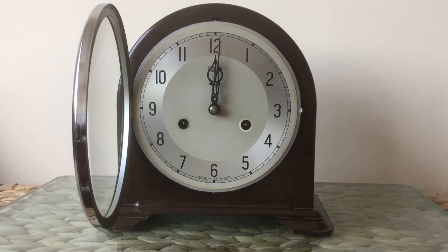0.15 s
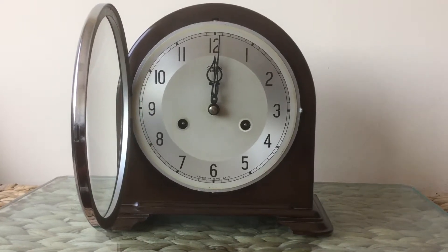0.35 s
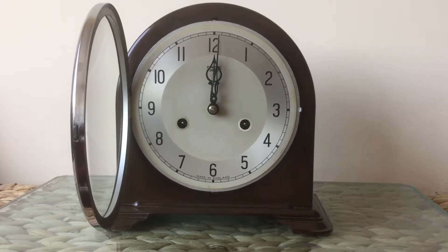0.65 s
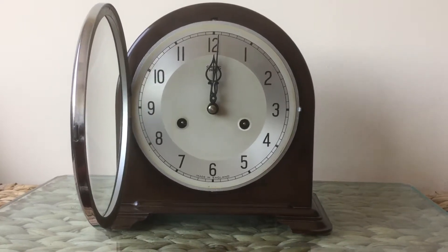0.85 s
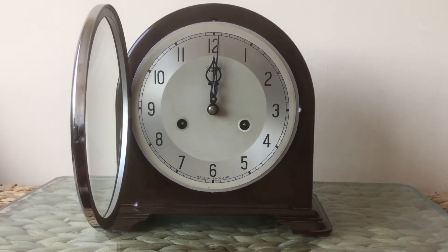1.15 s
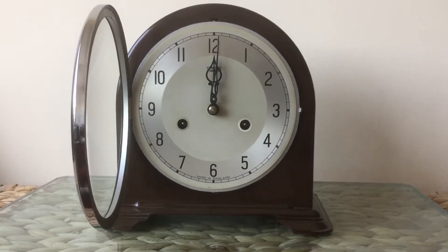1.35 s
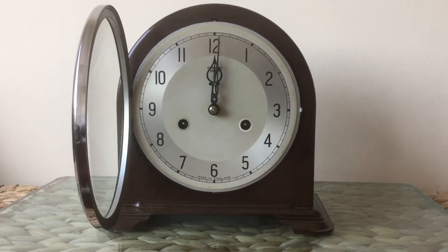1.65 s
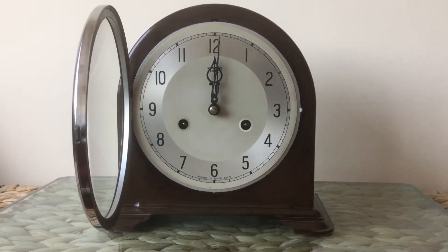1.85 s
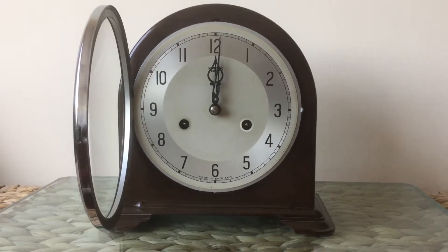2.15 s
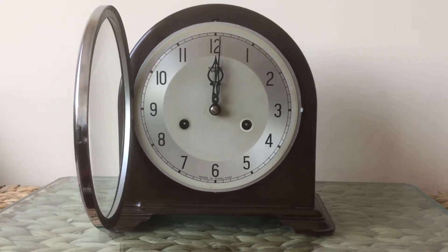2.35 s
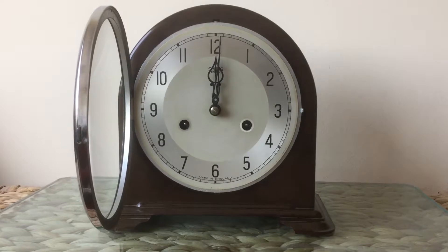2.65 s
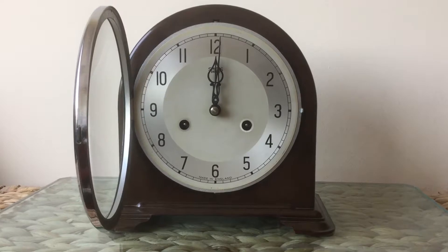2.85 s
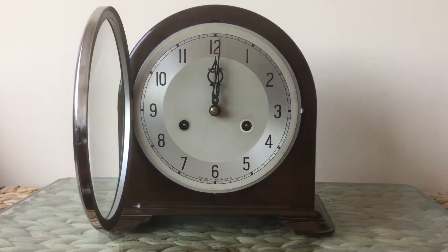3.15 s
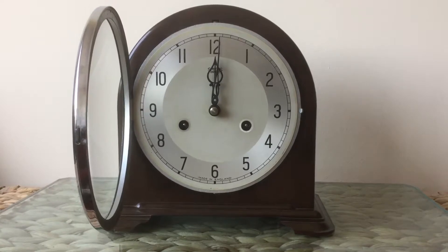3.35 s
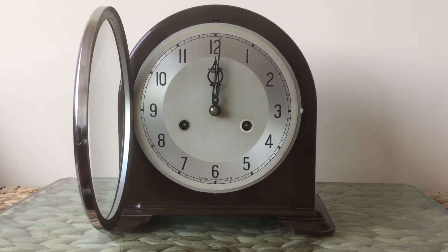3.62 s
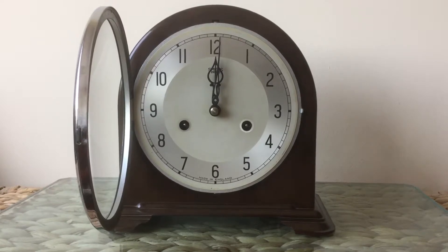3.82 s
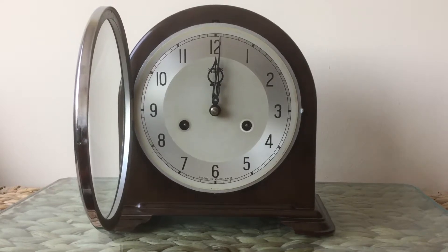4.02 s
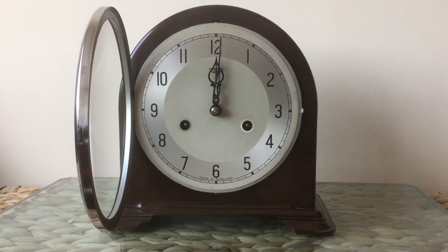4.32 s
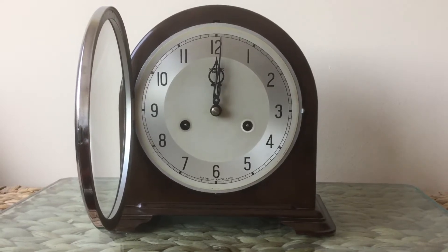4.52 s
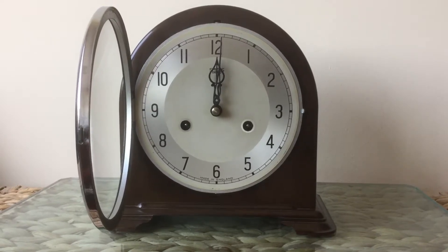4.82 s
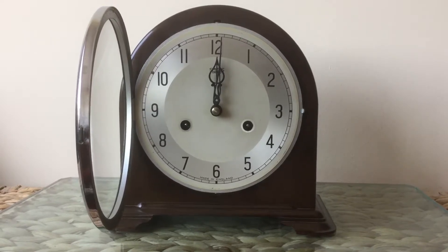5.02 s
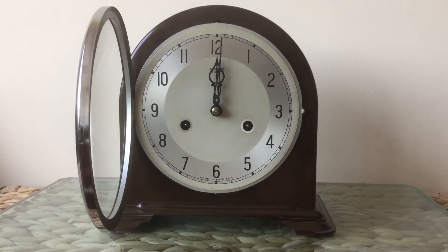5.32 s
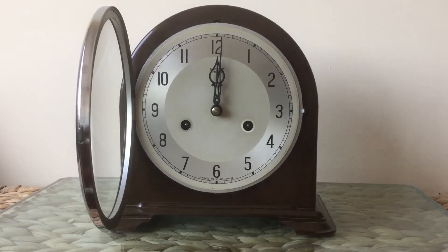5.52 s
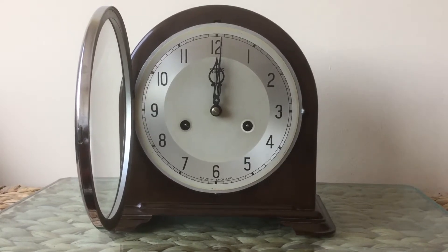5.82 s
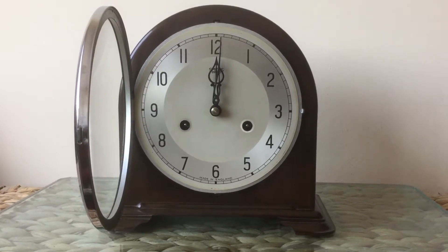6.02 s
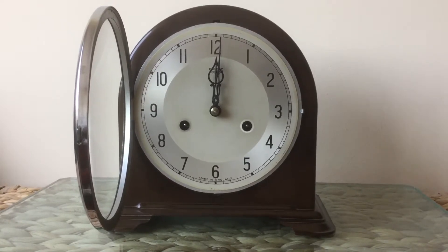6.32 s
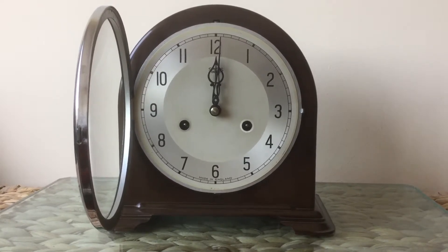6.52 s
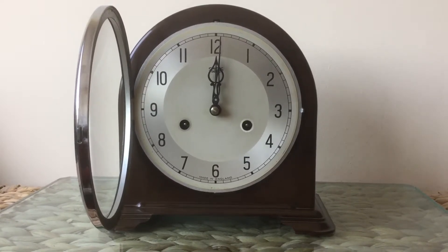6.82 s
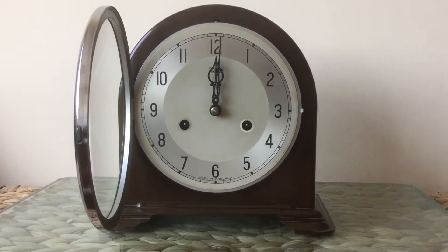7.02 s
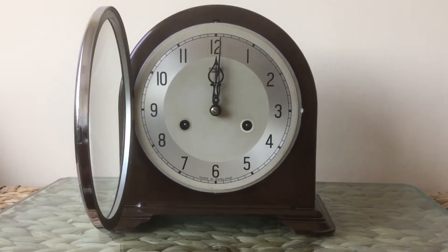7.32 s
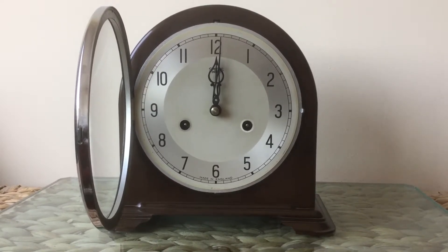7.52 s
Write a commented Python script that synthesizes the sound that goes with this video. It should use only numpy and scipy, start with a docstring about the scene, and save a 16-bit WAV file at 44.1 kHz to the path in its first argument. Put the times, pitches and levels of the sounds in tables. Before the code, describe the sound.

Three slow, evenly spaced strikes sound from the gong of a wooden mantel clock, heard up close in a still room. Each is announced by a small brassy click and lands with a short knock and chatter, then leaves a long, shimmering metal ring that overlaps the next. The ring of earlier blows is there from the start, and a faint fluttering whirr of clockwork runs underneath throughout.

```python
"""A mantel clock is striking the hour in a quiet room. At the start its coiled steel gong still rings
from earlier blows, and the fly, the air brake of the strike train, whirrs softly. A pin clicks as it
lifts the hammer. Then the hammer drops: the wooden case knocks, the hammer chatters on the coil, and
the gong's long partials add to what was left ringing. Click and blow come three times, about 2.7 s
apart, and the gong rings on after the last."""
import sys
import numpy as np
from scipy import signal
from scipy.fft import rfft, irfft
from scipy.io import wavfile

SR = 44100
rng = np.random.default_rng(int(sys.argv[2]) if len(sys.argv) > 2 else 0)


def unload_wav(signal):
    """Save mono or channel-first audio to the path in sys.argv[1] as 16-bit WAV at rate SR, clipped to [-1, 1]."""
    wavfile.write(
        sys.argv[1],
        SR,
        np.round(np.clip(np.atleast_2d(signal).T, -1, 1) * 32767).astype(np.int16),
    )


N = 338247


def undb(db):
    """Gain of a level in dB."""
    return 10 ** (np.asarray(db) / 20)


def level(x, db):
    """Scale to an rms level."""
    return x * undb(db) / np.sqrt(np.mean(x ** 2))


def along(table, hz):
    """Read a curve of (frequency, value) points on a log-frequency axis."""
    points_hz, values = np.transpose(table)
    return np.interp(np.log(hz), np.log(points_hz), values)


def coloured(eq, size):
    """Noise through an EQ curve, rolling off 4 dB an octave below its first point."""
    hz = np.maximum(np.arange(size // 2 + 1) * SR / size, 1)
    rolloff_db = 4 * np.maximum(np.log2(eq[0][0] / hz), 0)
    return irfft(rfft(rng.standard_normal(size)) * undb(along(eq, hz) - rolloff_db), size)


def ring(hz, t60, times, sizes, attack_s):
    """One mode kicked at the given times; each kick swells in and adds to the phase already ringing."""
    onsets = np.maximum(np.ceil(times * SR).astype(int), 0)
    parts = []
    for loss in np.log(1000) / t60, 1 / attack_s:
        pole = 2j * np.pi * hz - loss
        kicks = np.zeros(N, complex)
        np.add.at(kicks, onsets, sizes * np.exp(pole * (onsets / SR - times)))
        parts.append(signal.lfilter([1], [1, -np.exp(pole / SR)], kicks).imag)
    lasting, brief = parts
    return lasting - brief


def struck(modes, times, hit_db, scatter_db=3.5):
    """Short modes, each with a new phase and level at every hit."""
    out = 0
    chance = rng.random((len(times), len(modes), 2))
    for k, (hz, db, t60) in enumerate(modes):
        gains = undb(np.array(hit_db) + db + scatter_db * (chance[:, k, 0] - .5))
        phases = np.exp(2j * np.pi * chance[:, k, 1])
        out = out + ring(hz, t60, times, gains * phases, attack_s=.001)
    return out


# Room tone EQ: (frequency [Hz], relative level [dB])
ROOM_EQ = [(25, -13.5), (50, -13), (100, -2), (250, -0.5), (500, -18), (1200, -2.5), (3000, -30),
           (6000, -33), (10000, -34.5), (15500, -35)]


def room_tone():
    """Still air: a faint, dark bed of noise."""
    return level(coloured(ROOM_EQ, N), -63)


# Noise bands of the whirr: (centre [Hz], width [Hz], level [dB])
WHIRR_BANDS = [(2201, 30, -75), (2900, 310, -82), (6500, 2300, -90.5), (9320, 450, -81),
               (12900, 4000, -85.5)]


def fly_whirr(mean_hz=31.0, swing_hz=1.9, speedup_hz_per_s=.2, lag_s=.3, puff_sharpness=.5):
    """The vane puffs once a turn; it runs free once the hammer drops and slows under the next lift."""
    t = np.arange(N) / SR
    blows = np.append(BLOW_TIMES, 2 * BLOW_TIMES[-1] - BLOW_TIMES[-2])
    cycle = np.interp(t - lag_s, blows, np.arange(len(blows)))  # fastest lag_s after each blow
    rate_hz = mean_hz + swing_hz * np.cos(2 * np.pi * cycle) + speedup_hz_per_s * t
    turns = np.cumsum(rate_hz) / SR
    turn_gain = undb(2.3 * rng.standard_normal(N // 500))[turns.astype(int)]
    puffs = turn_gain * np.exp(-puff_sharpness * np.cos(2 * np.pi * turns))
    out = 0
    for hz, width, db in WHIRR_BANDS:
        resonance = signal.iirpeak(hz, hz / width, SR)
        out = out + level(signal.lfilter(*resonance, puffs * rng.standard_normal(N)), db)
    return out


# Cues for the hammer lifts: (time [s], level [dB])
LIFT_CUES = [(0.02, -54.5), (2.7357, -54.5), (5.431, -55.5)]
# Brass ring of the pin: (frequency [Hz], level relative to the cue [dB], decay t60 [s])
PIN_MODES = [(543, -7.5, 0.13), (1320, 2, 0.065), (2470, -7, 0.055), (6080, -14, 0.052), (7200, -11, 0.06),
             (8500, -8, .04), (15300, -8, .02)]


def pin_click(scrape_db=-5.5, scrape_t60=.076, low_cut_hz=2500):
    """The lifting pin meets the hammer tail: a short scrape and a faint ring of brass."""
    times, db = np.transpose(LIFT_CUES)
    triggers = np.zeros(N)
    triggers[(times * SR).astype(int)] = undb(db + scrape_db)
    envelope = signal.lfilter([1], [1, -undb(-60 / (scrape_t60 * SR))], triggers)
    scrape = signal.lfilter(*signal.butter(2, low_cut_hz, "high", fs=SR), rng.standard_normal(N))
    return envelope * scrape + struck(PIN_MODES, times, db)


# EQ of the hammer's rattle: (frequency [Hz], relative level [dB])
CHATTER_EQ = [(60, -24), (150, -13), (600, -8), (1100, 1), (2000, -10.5), (4000, -15.5), (6500, -15.5),
              (9000, -17), (11000, -14.5), (12700, -22), (14300, -19), (15500, -27)]
# Its tail in the case and room: (frequency [Hz], decay t60 [s])
CHATTER_DECAY = [(300, 0.48), (2000, 0.29), (6000, 0.2), (15000, 0.15)]


def hammer_chatter(attack_s=.0046, release_at_s=.027, grain_db=1.5):
    """The hammer rattles briefly on the coil; case and room carry it on, the treble dying first."""
    out, size = np.zeros(N + SR), SR // 2
    t = np.arange(size) / SR
    attack = np.minimum(t / attack_s, 1) ** 2
    for time in BLOW_TIMES[BLOW_TIMES > 0]:
        start = int(time * SR)
        grains = undb(grain_db * np.repeat(rng.exponential(size=size // 64 + 1), 64)[:size])
        rattle = level(coloured(CHATTER_EQ, size) * grains, -35.5)
        for hz in 100 * 2. ** np.arange(8):
            edges_hz = [hz / 2 ** .5, min(hz * 2 ** .5, .49 * SR)]
            octave = signal.sosfilt(signal.butter(3, edges_hz, "band", fs=SR, output="sos"), rattle)
            release = undb(-60 * np.maximum(t - release_at_s, 0) / along(CHATTER_DECAY, hz))
            out[start:start + size] += octave * attack * release
    return out[:N]


# Body of the wooden case: (frequency [Hz], level [dB], decay t60 [s])
CASE_MODES = [(204, -37.5, 0.057), (538, -35, 0.2), (755, -46, 0.16), (982, -17, 0.023), (1210, -39, 0.059),
              (2420, -27.5, 0.015), (2990, -48, 0.29)]


def case_knock(bounce_s=.0085):
    """The case knocks in a tight flam as the hammer hits the coil and touches it a second time."""
    hit = struck(CASE_MODES, BLOW_TIMES, BLOW_ACCENTS)
    bounce = struck(CASE_MODES, BLOW_TIMES + bounce_s, BLOW_ACCENTS)
    return hit + bounce


# Cues for the hammer blows; those before zero leave only their ring: (time [s])
BLOW_TIMES = np.array([-12.52165, -9.87919, -7.26131, -4.60689, -1.86231, .7704, 3.5048, 6.18259])
# Accent of each blow: (gain [dB])
BLOW_ACCENTS = [.4, .4, .4, 0.28, 0.79, 0.29, 0.26, 0.44]
# Partials of the coil; close pairs beat: (frequency [Hz], level [dB], decay t60 [s])
GONG_PARTIALS = [(137.9, -68.9, 40.4), (167.2, -54.3, 18.5), (219.79, -50.2, 28.2), (288.75, -56.0, 21.7),
                 (367.08, -45.0, 11.2), (452.99, -38.6, 2.3), (653.55, -60.7, 20.4), (657.18, -48.5, 9.7),
                 (766.14, -44, 19.0), (881.83, -38.4, 13.0), (1007.22, -32.6, 8.8), (1138.91, -37.6, 12.9),
                 (1144.35, -58.2, 10.8), (1227.04, -66, 6.3), (1276.27, -61.2, 13.0),
                 (1419.53, -50.8, 15.3), (1569.43, -41.4, 13.8), (1724.29, -43.1, 9.9),
                 (1887.07, -46.9, 8.4), (2054.09, -56.8, 8.3), (2227.95, -56.5, 11.0),
                 (2229.39, -64.3, 12.2), (2409.45, -60.5, 6.3), (2595.95, -52.7, 7.0),
                 (2788.42, -63.0, 8.5), (2923.2, -71, 5.0), (2987.67, -58.7, 6.9), (3052.15, -67.5, 5.5),
                 (3192.84, -55.3, 7.1), (3405.14, -57.4, 4.4), (3621.84, -52.2, 4.6), (3627.41, -49.6, 3.4),
                 (3848.16, -60.4, 5.2), (3909.09, -68, 4.8), (4029.91, -70, 4.8), (4079.01, -51.6, 6.0),
                 (4560.6, -42.5, 3.3), (4811.81, -53.9, 5.2), (5067.58, -59.4, 5.8), (5329.85, -66.3, 4.2),
                 (5597.83, -59.6, 3.8), (5872.08, -60.1, 4.8), (6729.7, -76.1, 3.2), (7638.72, -76.2, 2.9),
                 (7954.22, -76.3, 2.9), (10676.6, -76.7, 1.9)]
# Rough tremble on each partial: (partial frequency [Hz], depth [dB])
TREMBLE_DEPTH = [(200, -34), (800, -16), (1600, -23.5), (2600, -13.5), (3400, -8), (4600, -24),
                 (6000, -18.5)]


def gong(dispersion=1.3, tremble_hz=55):
    """Each blow drives the same mix of partials; bending waves spread, so they start out of step."""
    out = 0
    for hz, db, t60 in GONG_PARTIALS:
        push = undb(db + np.array(BLOW_ACCENTS)) * np.exp(1j * dispersion * np.sqrt(hz))
        slow_noise = signal.lfilter(*signal.butter(2, tremble_hz, fs=SR), rng.standard_normal(N))
        tremble = level(slow_noise, along(TREMBLE_DEPTH, hz))
        out = out + ring(hz, t60, BLOW_TIMES, push, attack_s=.0061) * (1 + tremble)
    return out


def scene():
    """Mono mix: the strike up front, clockwork and room tone behind it."""
    strike = gong() + case_knock() + hammer_chatter()
    return (strike + pin_click() + fly_whirr() + room_tone())[None]


def record(dry, low_cut_hz=42.8, high_cut_hz=15850):
    """The microphone loses the deep bass and cuts the top."""
    thin = signal.lfilter(*signal.butter(2, low_cut_hz, "high", fs=SR), dry)
    return signal.sosfilt(signal.ellip(10, .2, 80, high_cut_hz, fs=SR, output="sos"), thin)


dry = scene()
out = record(dry)
unload_wav(out)
```